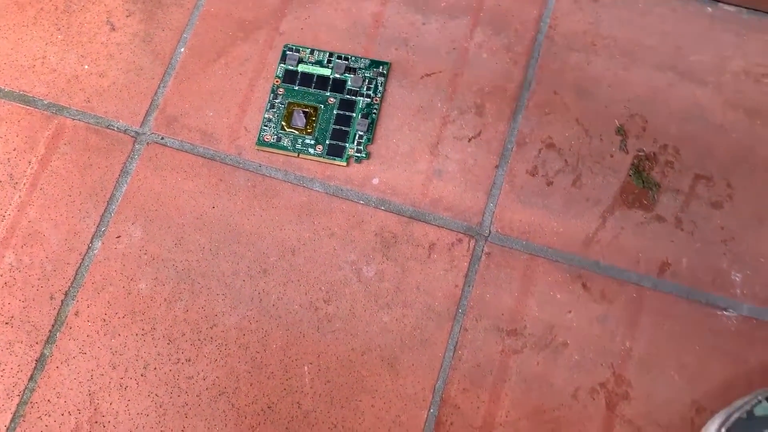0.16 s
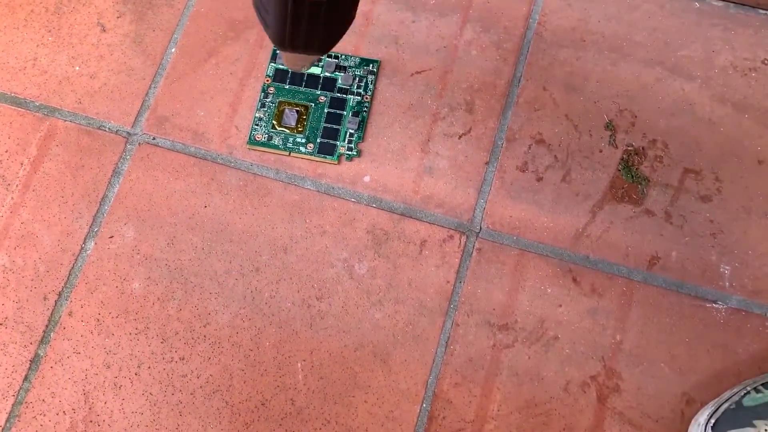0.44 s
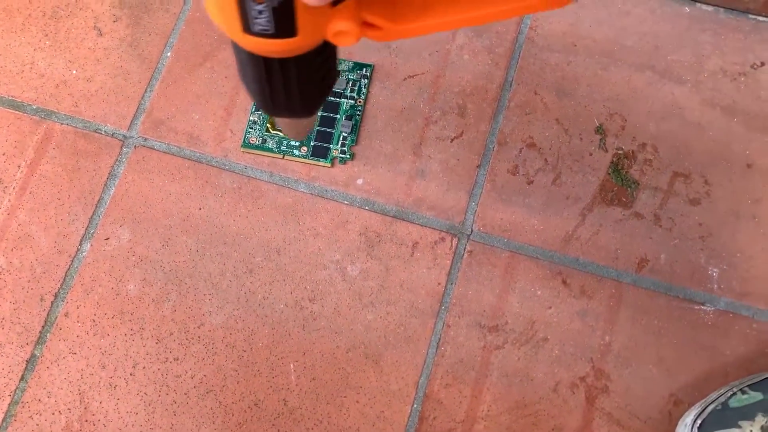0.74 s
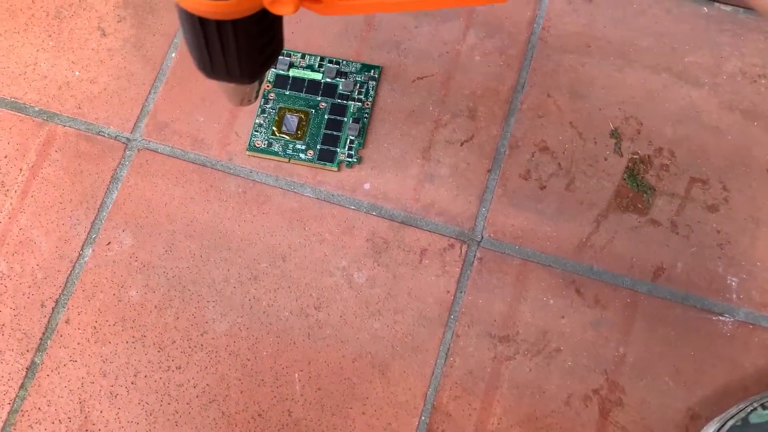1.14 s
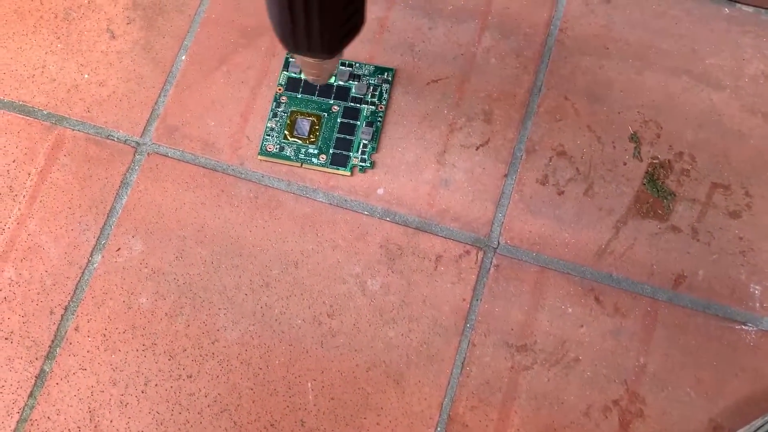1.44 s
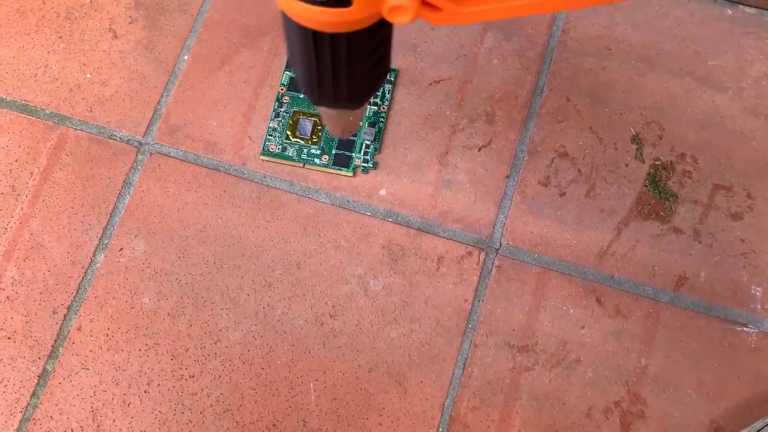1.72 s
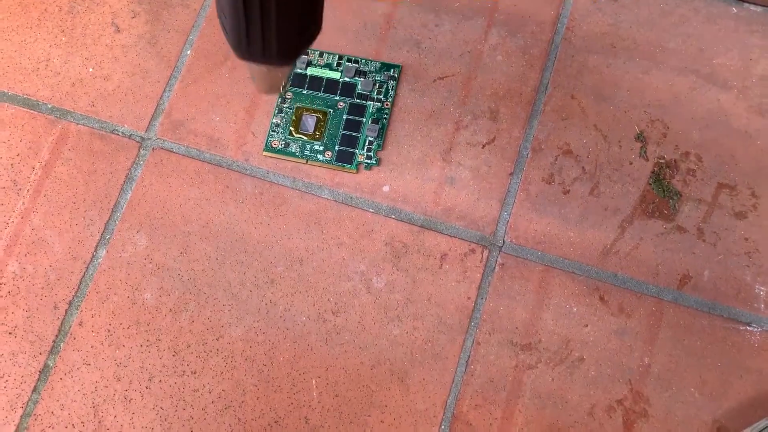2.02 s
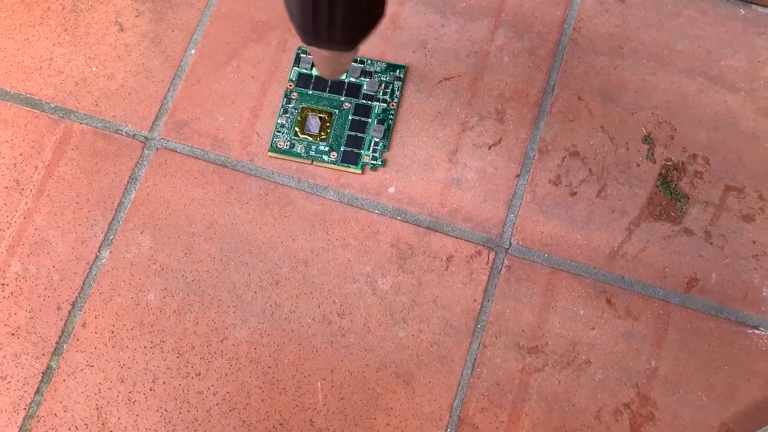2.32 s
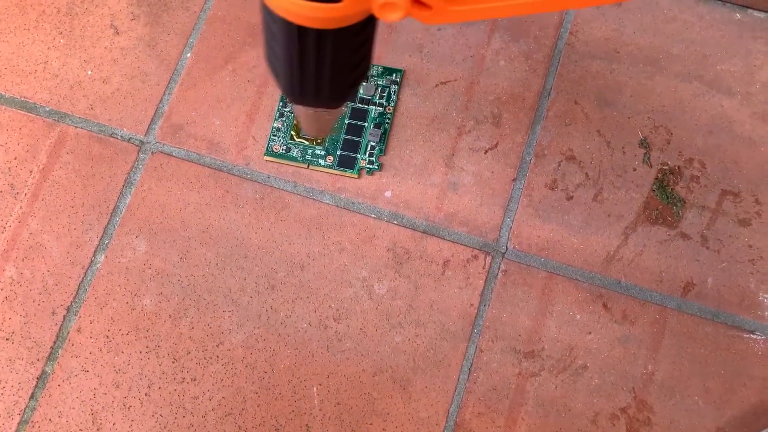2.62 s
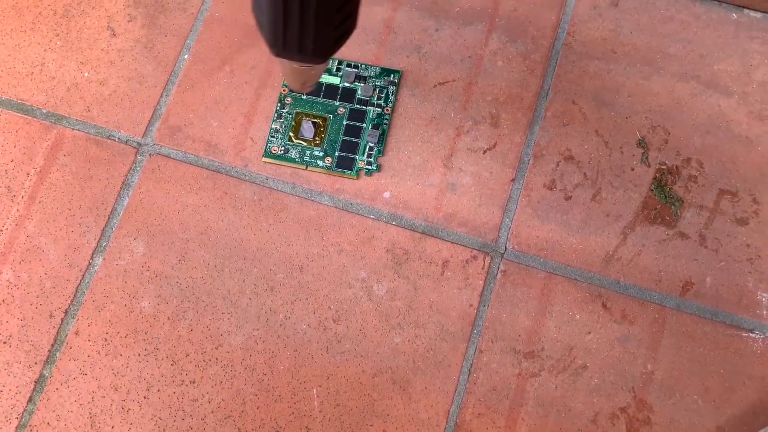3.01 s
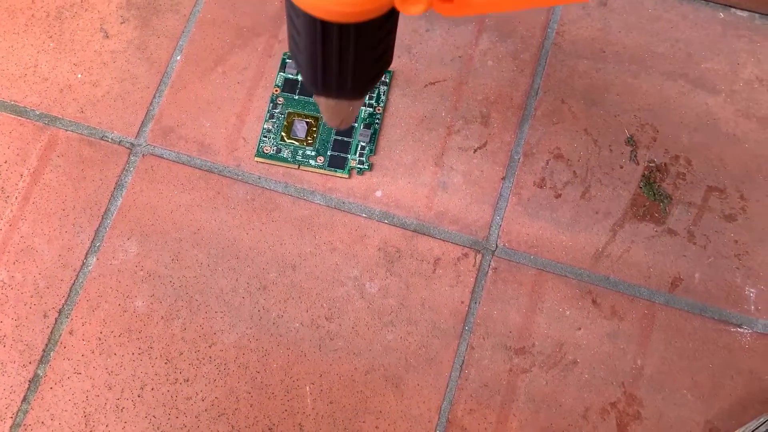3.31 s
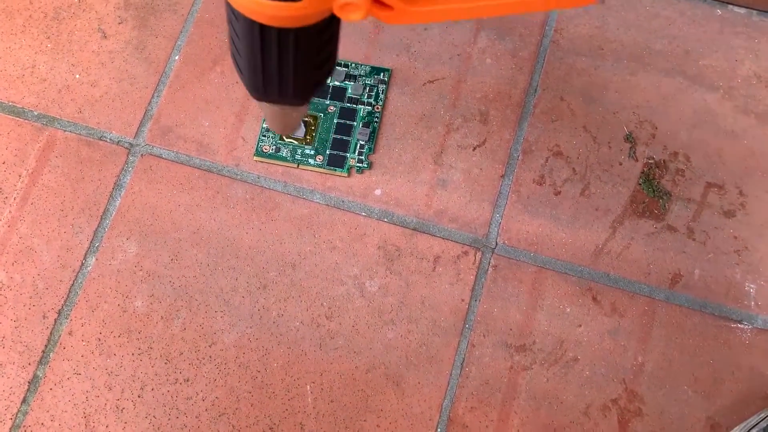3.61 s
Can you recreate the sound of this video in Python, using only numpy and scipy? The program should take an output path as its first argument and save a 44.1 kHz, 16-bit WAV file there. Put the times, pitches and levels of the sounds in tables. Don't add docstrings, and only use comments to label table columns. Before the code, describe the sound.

Steady heat gun airflow, broad and hissy, starts with a hollow hum-like ring, briefly buffets the phone microphone, then continues with shifting tone and thin whistle over a small board on hard tiles.

```python
import sys
import numpy as np
from scipy import signal
from scipy.fft import rfft, irfft
from scipy.io import wavfile
from scipy.ndimage import uniform_filter1d, map_coordinates

SR = 44100
rng = np.random.default_rng(int(sys.argv[2]) if len(sys.argv) > 2 else 0)


def pcm_store(signal):
    levels = np.round(np.clip(np.atleast_2d(signal), -1, 1) * 32767)
    wavfile.write(sys.argv[1], SR, levels.astype(np.int16).T)


def gain_from_decibels(decibels):
    exponent = np.asarray(decibels, float) / 20
    return 10 ** exponent


N = 165375
T = np.arange(N) / SR

# t/s, level/dB, nozzle facing the phone/dB, jet on the board/dB
GUN_MOTION = [(0, -31.5, -8.5, -8), (.2, -28, -6, -5.5), (.36, -28, -8, -2.5), (.44, -28, -2, -4),
              (.7, -29.5, 1, -1), (.93, -29, 1, -1), (1.0, -28.5, 0, 3.5), (1.3, -28, 0, 2.5),
              (1.5, -27, -0.5, 3), (1.76, -27.5, 0, 5), (1.82, -27.5, 2.5, -1.5), (2.5, -27, 1, -2),
              (3.0, -27.5, 1.5, -3), (3.4, -27, 0.5, -2.5), (3.75, -27, 0.5, -2.5)]
FACING, ON_BOARD = 2, 3

# f/Hz, level per Hz/dB
ROAR_COLOUR = [(30, 8.5), (70, 7.5), (200, -3.5), (450, -8), (900, 3), (3000, -5), (6000, -11),
               (15500, -10)]
# f/Hz, nozzle share/0-1, board share/0-1
ROAR_SHARES = [(300, 0.06, 0.09), (1160, 0.26, 0.49), (2870, 0.57, 1), (5060, 0, 0.56), (12000, 1, 0.31)]
SWELL_DB, FLICKER_DB = 1.64, 2

# f/Hz, width/Hz, level/dB, nozzle share, board share
BARREL_RINGS = [(295.5, 41, -15, 1, -0.35), (824, 144, -11.5, 0.98, -0.29), (1008, 122, -7, -.4, 0.16),
                (1330, 240, -26, 0, .3), (1927, 110, -15.5, -0.84, 0.13), (2207, 74, -15, 0.48, 0.77),
                (2780, 370, -23, 0.4, 1), (3070, 66, -14.5, -0.054, 1), (3446, 65, -19, -0.6, 0.63),
                (3820, 160, -18.5, 0.94, -0.99)]
# f/Hz, width/Hz, level/dB, nozzle share, board share
NOZZLE_RINGS = [(4560, 750, -22.5, 0.17, 0.15), (5415, 160, -8.5, 1, 0.5), (6320, 100, -20.5, 0.97, 0),
                (7180, 420, -12, 1, 1), (8010, 130, -16.5, 0.64, -.5), (8550, 200, -18, 0.51, -0.21),
                (9340, 440, -13, 0.52, -0.11), (10660, 840, -12, 0.54, -0.27), (11670, 580, -11, 1, 0.14),
                (12770, 380, -12, 1, 0.064), (13600, 400, -24, 1, 0), (14200, 400, -18.5, 1, 0)]
RING_SWAY_DB = 2.4

# f/Hz, width/Hz, level/dB
INTAKE_RINGS = [(920, 69, -11), (1092, 170, -11.5), (1914, 110, -17), (2080, 54, -14.5), (3440, 58, -14)]
# t/s, level/dB
INTAKE_FADE = [(0, 0.5), (.55, 0), (.8, -19), (1.2, -30)]

# t/s, level/dB
BLADE_LEVEL = [(0, -29), (1.2, -13), (1.8, -15.5), (2.4, -19), (3.0, -12.5), (3.75, -11.5)]
BLADE_HZ, BLADE_WIDTH_HZ = 1631, 24

GUST_START_S, GUST_END_S, GUST_EDGE_S = 0.722, 0.975, 0.018
GUST_HZ, GUST_WIDTH_HZ, GUST_DB, GUST_FLUTTER_DB = 79, 69, -24, 1.5
RATTLE_HZ, RATTLE_WIDTH_HZ, RATTLE_DB = 300, 170, -9.5
# t/s, peak level/dB, f/Hz, length/cycles (negative = suction)
EDDIES = [(.728, -13.5, 400, 0.37), (0.732, -12.5, 208, -0.64), (.747, -16, 101, 0.36),
          (.767, -13, 168, -0.66), (.802, -17, 300, -0.34), (0.812, -11, 210, 0.48),
          (.829, -12.5, 88, -0.7), (0.84, -11.5, 346, 0.34), (0.865, -23, 400, 0.44),
          (.880, -5.5, 231, 0.16), (0.886, -15, 90, -0.36), (.903, -8, 264, 0.36), (.914, -22, 350, -0.25),
          (.923, -21, 250, -0.45), (.935, -14.5, 180, 0.61), (.946, -19, 111, -0.35),
          (0.952, -12.5, 420, 0.34)]

# delay/ms, level/dB
ECHOES = [(.45, -15), (0.798, -17), (1.2, -16.5), (1.851, -17.5), (2.5, -27), (3.102, -15)]
ECHO_LOW_HZ, ECHO_TOP_HZ = 1400, 9050
ECHO_DRIFT_MS, ECHO_SWAY_DB = 0.036, 1.5

# t/s, bass level/dB
WIND_FILTER = [(0, 2.5), (.45, -1), (.6, 2.5), (.96, -0.5), (.99, -3.5), (1.4, -5), (1.75, -1.5), (1.85, 0),
               (2.8, -2), (3.75, 0.5)]
WIND_FILTER_HZ = 660

# f/Hz, phase/rad
GUN_PHASE = [(0, 0.073), (700, 0.32), (1700, 0.27), (2250, -1.25), (3000, -0.96), (3900, -2.03)]
# f/Hz, phase/rad
TREBLE_PHASE = [(4700, -3.16), (6750, -6.25), (16000, -19.75)]
# f/Hz, phase/rad
GUST_PHASE = [(0, 0.1), (90, 0.47), (330, 1.3), (600, 1), (1200, .3)]
# f/Hz, level against the direct sound/dB
ROOM_COLOUR = [(60, -30), (250, -14), (480, -9), (1000, -14.5), (1700, -19), (3000, -8), (6000, -20),
               (15000, -23)]
LEFT_DB, LEFT_HZ = 0.7, 900

BASS_HZ, TOP_HZ = 42, 15720


def line(table, x, col=1, log=False):
    a = np.array(table, float)
    if log:
        return np.interp(np.log(x), np.log(a[:, 0]), a[:, col])
    return np.interp(x, a[:, 0], a[:, col])


def unit(x):
    return x / np.sqrt(np.mean(x ** 2))


def band(x, hz, width_hz):
    b, a = signal.iirpeak(min(hz, 0.45 * SR), hz / width_hz, fs=SR)
    return signal.lfilter(b, a, x)


def walk(rate):
    hold = int(SR / rate)
    steps = np.repeat(rng.standard_normal(N // hold + 1), hold)
    smooth = uniform_filter1d(uniform_filter1d(steps, hold), hold)
    return 1.22 * smooth[:N]


def noise():
    return rng.standard_normal(N)


def gun():
    sound = air_roar() + casing_rings() + intake_grille() + blade_whistle()
    return sound * gain_from_decibels(line(GUN_MOTION, T) - 1)


def air_roar():
    roar = 0
    swell = SWELL_DB * walk(1.7)
    facing, on_board = line(GUN_MOTION, T, FACING), line(GUN_MOTION, T, ON_BOARD)
    for hz in 32 * 2 ** (np.arange(28) / 3):
        db = line(ROAR_COLOUR, hz, log=True) + swell + FLICKER_DB * walk(14)
        db = db + line(ROAR_SHARES, hz, 1, True) * facing
        db = db + line(ROAR_SHARES, hz, 2, True) * on_board
        hiss = band(band(noise(), hz, hz / 2), hz, hz / 2)
        roar = roar + gain_from_decibels(db) * np.sqrt(hz) * unit(hiss)
    return unit(roar)


def casing_rings():
    out = 0
    facing, on_board = line(GUN_MOTION, T, FACING), line(GUN_MOTION, T, ON_BOARD)
    for hz, width, db, nozzle, board in BARREL_RINGS + NOZZLE_RINGS:
        db = db + nozzle * facing + board * on_board + RING_SWAY_DB * walk(2.514)
        out = out + gain_from_decibels(db) * unit(band(noise(), hz, width))
    return out


def intake_grille():
    out = 0
    for hz, width, db in INTAKE_RINGS:
        db = db + line(INTAKE_FADE, T) + 2.0 * walk(7.8)
        out = out + gain_from_decibels(db) * unit(band(noise(), hz, width))
    return out


def blade_whistle():
    db = line(BLADE_LEVEL, T) + 2.0 * walk(8.02)
    return gain_from_decibels(db) * unit(band(noise(), BLADE_HZ, BLADE_WIDTH_HZ))


def gust():
    gate = np.clip(np.minimum(T - GUST_START_S, GUST_END_S - T) / GUST_EDGE_S, 0, 1)
    flutter = band(band(noise(), GUST_HZ, GUST_WIDTH_HZ), GUST_HZ, 2 * GUST_WIDTH_HZ)
    rattle = band(band(noise(), RATTLE_HZ, RATTLE_WIDTH_HZ), RATTLE_HZ, 2 * RATTLE_WIDTH_HZ)
    level = gate * gain_from_decibels(GUST_DB + GUST_FLUTTER_DB * walk(51.7))
    out = level * (unit(flutter) + gain_from_decibels(RATTLE_DB) * unit(rattle))
    for s, db, hz, cycles in EDDIES:
        turns = (T - s) * hz
        bump = np.exp(-0.5 * (turns / cycles) ** 2) * np.cos(2 * np.pi * turns)
        out = out + np.sign(cycles) * gain_from_decibels(db) * bump
    return out


def wind_filter(air):
    low_pass = signal.butter(3, WIND_FILTER_HZ, fs=SR, output="sos")
    bass = signal.sosfiltfilt(low_pass, air)
    return air + (gain_from_decibels(line(WIND_FILTER, T)) - 1) * bass


def ports(x, phase):
    hz = np.arange(N // 2 + 1) * SR / N
    turn = np.exp(0.5j * line(phase, hz))
    return irfft(rfft(x) * np.array([1 / turn, turn]), N)


def echoes(x):
    treble_band = signal.butter(1, [ECHO_LOW_HZ, ECHO_TOP_HZ], "band", fs=SR, output="sos")
    bright = signal.sosfilt(treble_band, x)
    for ms, db in ECHOES:
        delay_s = (ms + ECHO_DRIFT_MS * walk(1.6)) / 1000
        echo = map_coordinates(bright, [(T - delay_s) * SR], mode="mirror")
        x = x + gain_from_decibels(db + ECHO_SWAY_DB * walk(1.09)) * echo
    return x


def room_sound(x, hz):
    room = irfft(rfft(x) * gain_from_decibels(line(ROOM_COLOUR, hz, log=True)), N)
    return np.array([room, np.roll(room, 1500)])


def scene():
    direct, scattered = wind_filter(np.array([echoes(gun()), gun()]))
    hz = np.arange(N // 2 + 1) * SR / N + 1
    mix = ports(direct, GUN_PHASE + TREBLE_PHASE) + ports(gust(), GUST_PHASE) + room_sound(scattered, hz)
    lean = gain_from_decibels(np.array([[LEFT_DB], [-LEFT_DB]]) / 2 * (hz < LEFT_HZ))
    return irfft(rfft(mix) * lean, N)


def top_cut(x):
    return signal.sosfilt(signal.butter(12, 16750, fs=SR, output="sos"), x)


def record(dry):
    no_rumble = signal.butter(4, BASS_HZ, "high", fs=SR, output="sos")
    no_top = signal.ellip(12, 0.2, 80, TOP_HZ, fs=SR, output="sos")
    mix = signal.sosfilt(no_top, signal.sosfilt(no_rumble, dry))
    return top_cut(mix)


dry = scene()
out = record(dry)
pcm_store(out)
```